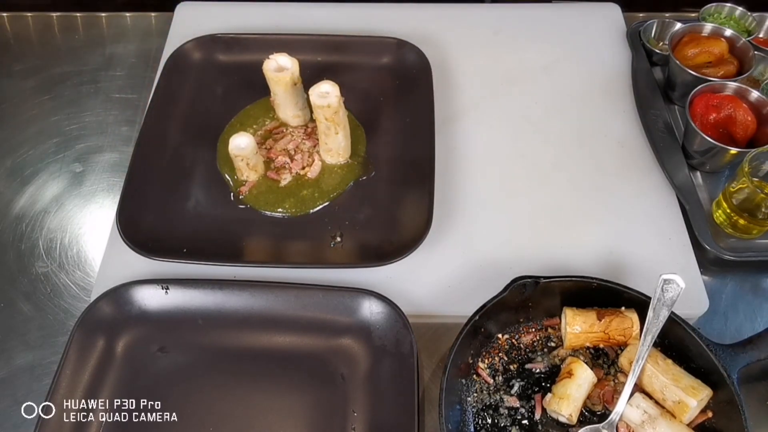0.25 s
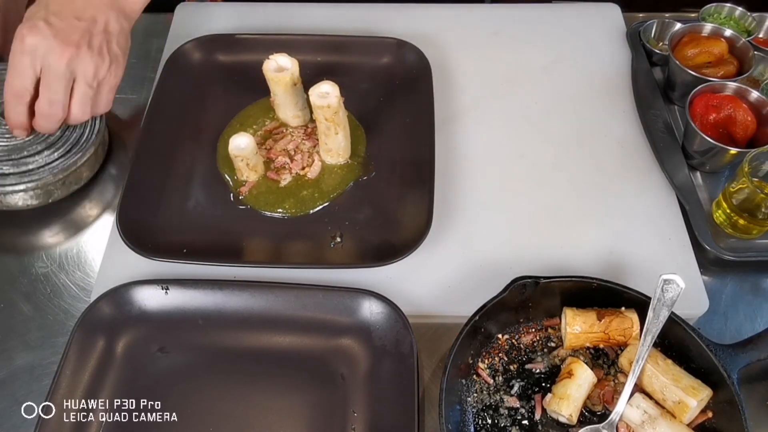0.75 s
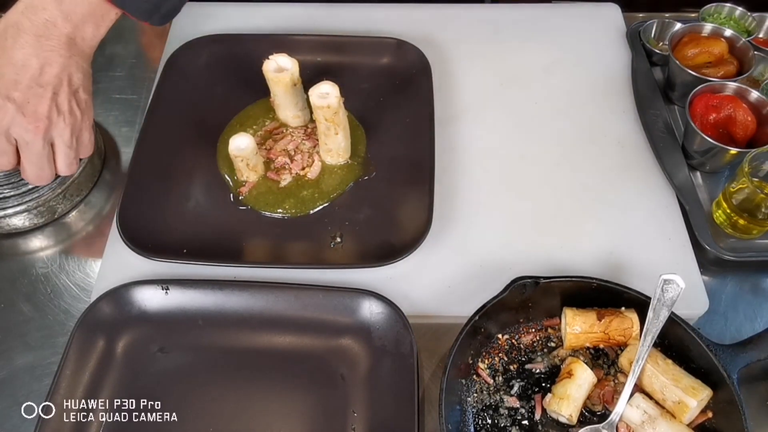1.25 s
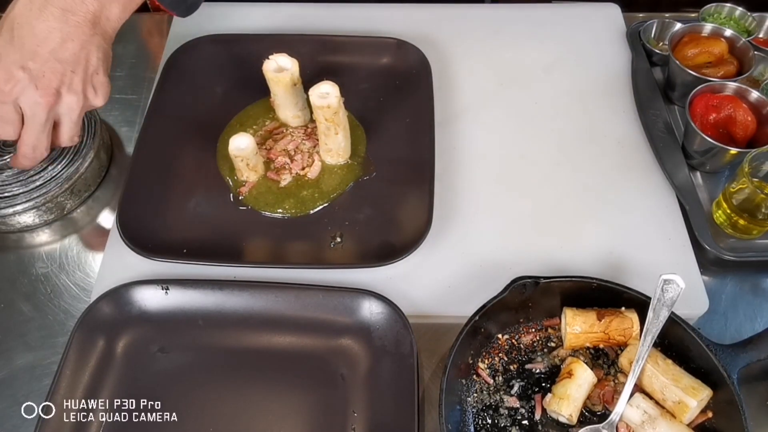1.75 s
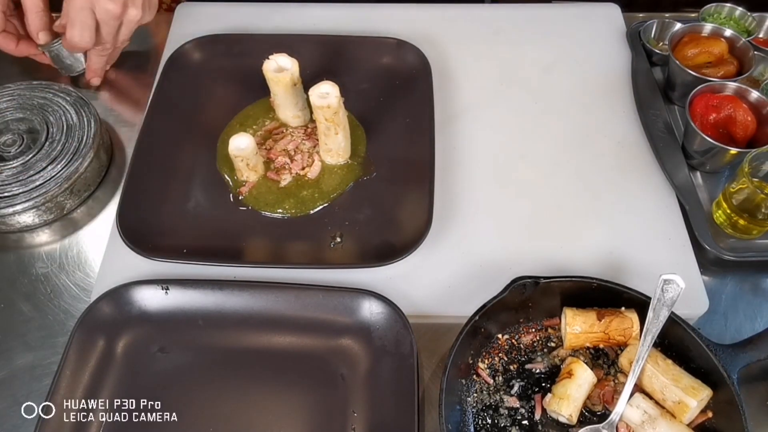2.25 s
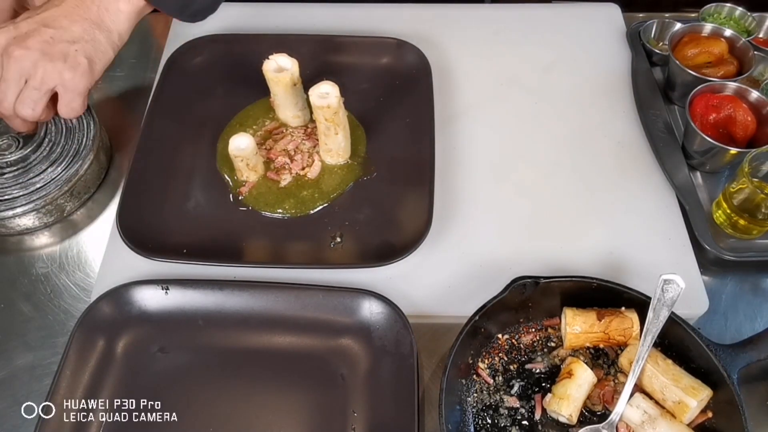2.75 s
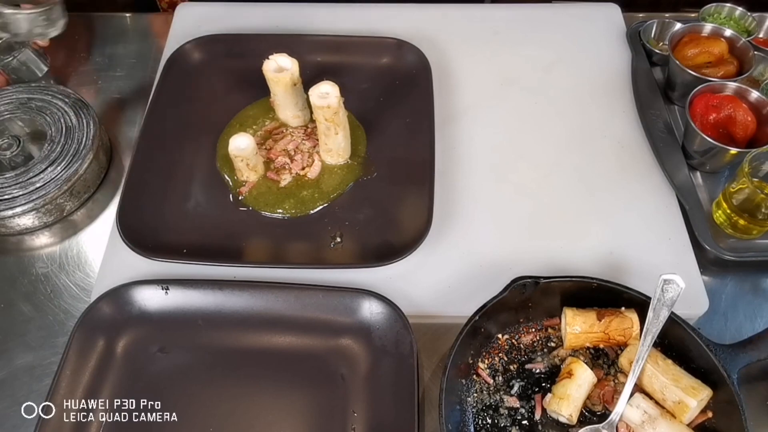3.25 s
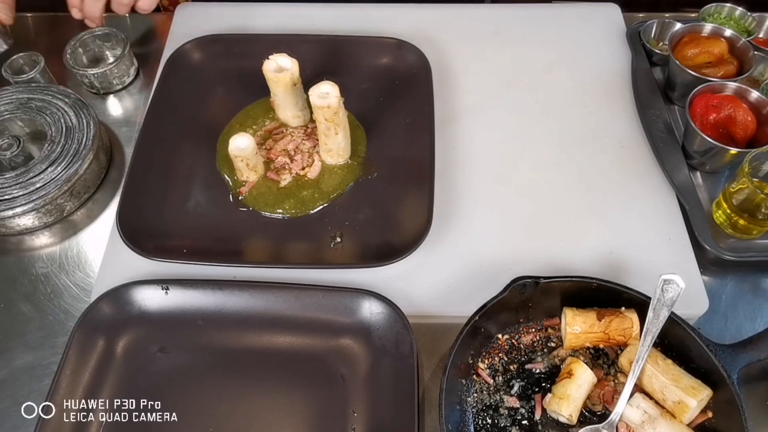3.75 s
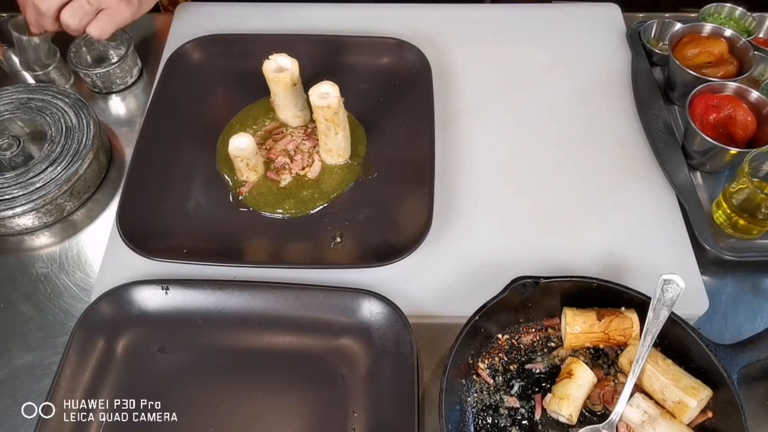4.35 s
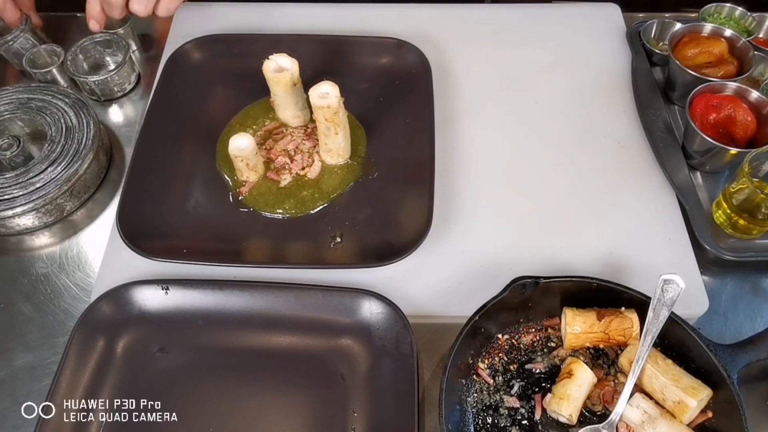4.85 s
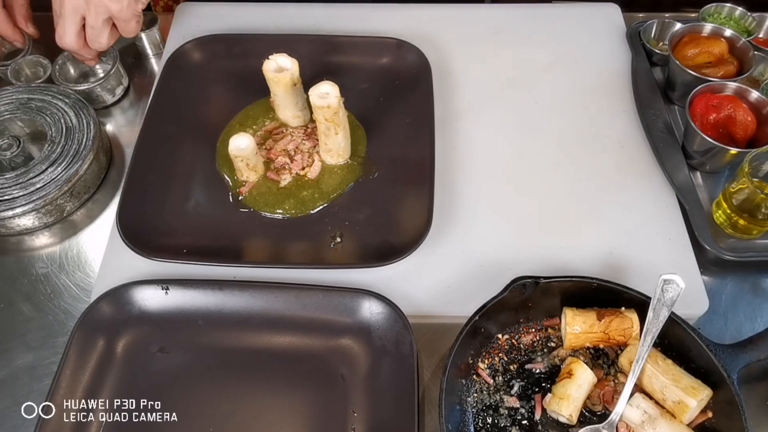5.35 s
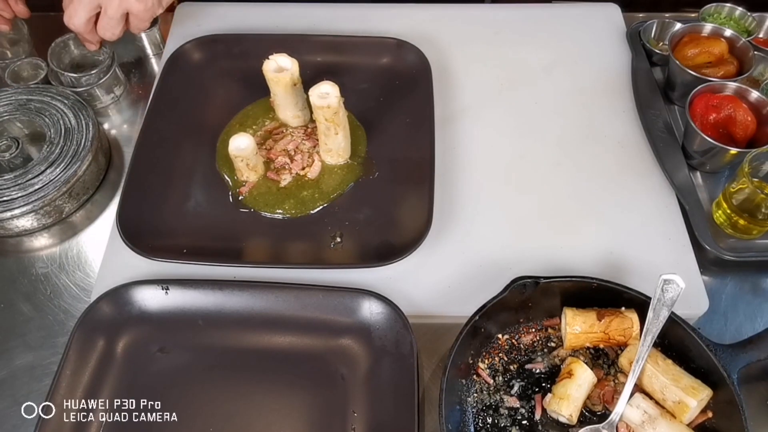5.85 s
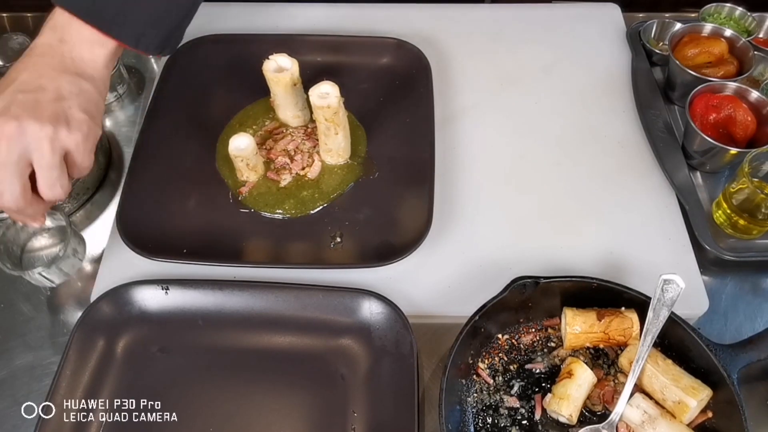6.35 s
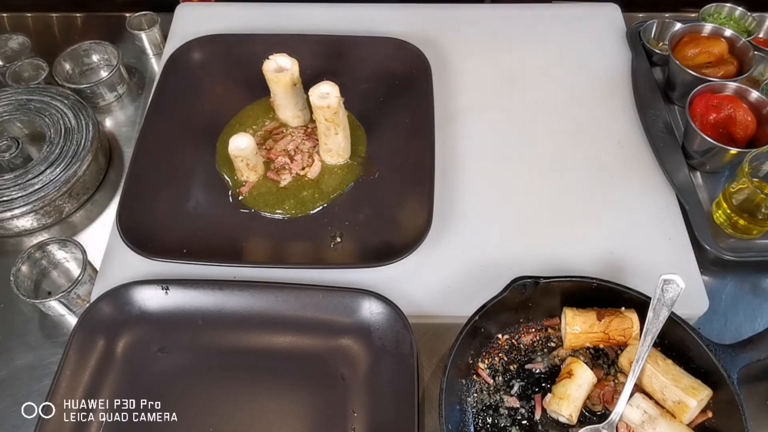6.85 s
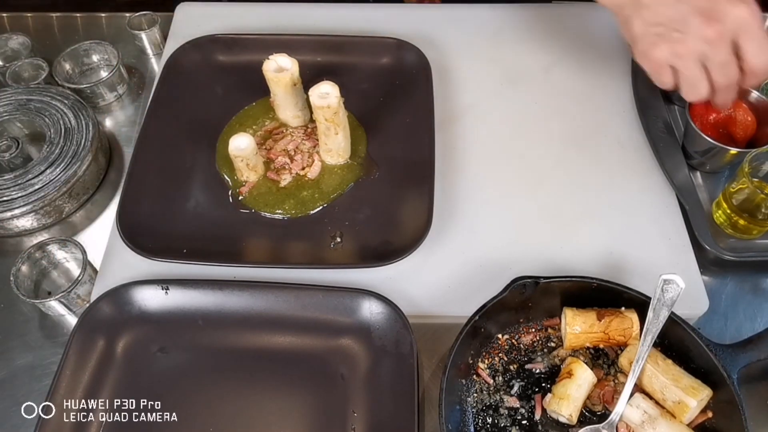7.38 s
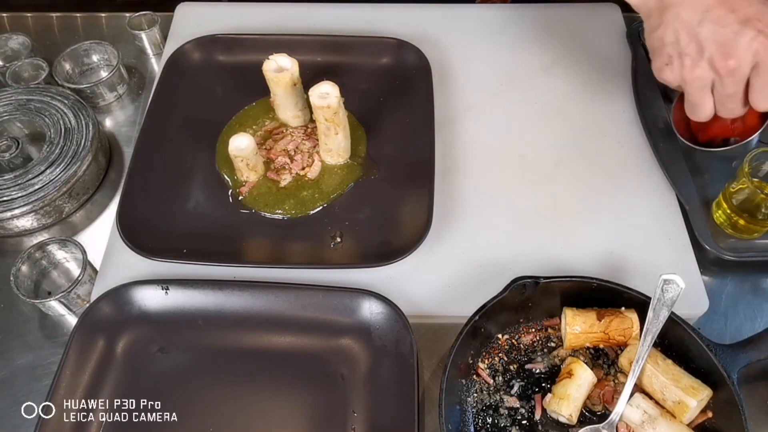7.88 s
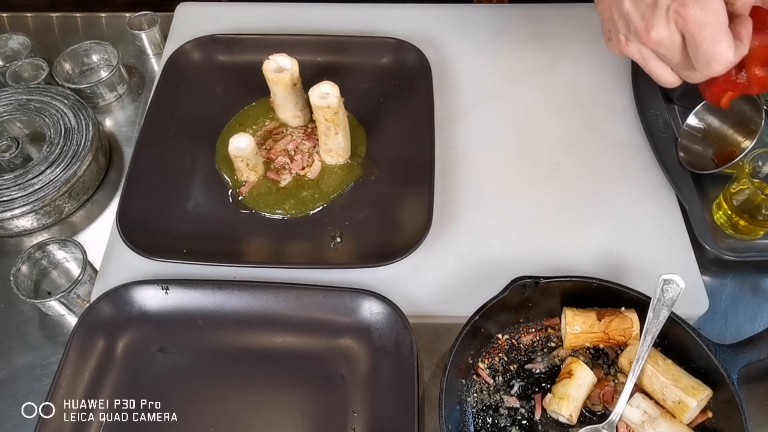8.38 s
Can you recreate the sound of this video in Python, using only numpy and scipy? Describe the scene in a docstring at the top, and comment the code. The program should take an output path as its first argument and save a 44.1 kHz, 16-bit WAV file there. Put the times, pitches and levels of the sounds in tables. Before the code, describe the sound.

A close stereo phone pickup in a hard-walled kitchen, with quiet low rumble, faint hiss and a wavering fridge hum. At 0 s a nest of thin steel rings gives a fading low rattle, then light ticks to 0.6 s. From 0.9 s it lands loudly on the steel worktop; another heavy clack with a deep boom comes near 1.5 s, and a rattling cluster at 1.75-2 s. Softer shuffles and scrapes fill 2.3-3.1 s. Sharp hollow clanks follow at 3.15, 3.6 and 3.8 s, then irregular knocks and gritty slides from 4.1 to 6 s, strongest near 5.7 s. One duller set-down sounds at 6.57 s. It is nearly quiet until a faint metal touch at 7.6 s; clacks at 8.0-8.25 s bring high, short cup rings, and a last faint knock near 8.6 s.

```python
"""Thin steel ring molds are picked out of their nest, knocked together and set down on a steel worktop.
Each knock is a rattle of noise bursts through the worktop's thump and modes and the mold's ring.
Gritty noise swells as steel slides and rattles on, pushes boom the worktop; cup and bowl ring as dying sines.
The place is a hard-walled kitchen with noise-tail echoes, background noise and a faint, wavering fridge hum.
A phone's two microphones hear it, with small differences in delay, level and treble."""
import sys
import numpy as np
from scipy import signal
from scipy.fft import rfft, irfft
from scipy.io import wavfile
from scipy.ndimage import uniform_filter1d

SR = 44100
rng = np.random.default_rng(int(sys.argv[2]) if len(sys.argv) > 2 else 0)


def pcm_store(signal):
    """Save signal as 16-bit PCM."""
    levels = np.round(np.clip(np.atleast_2d(signal), -1, 1) * 32767)
    wavfile.write(sys.argv[1], SR, levels.astype(np.int16).T)


N = 380141


def gain_of(db):
    """Amplitude factor of a level in dB."""
    return 10 ** (np.asarray(db) / 20)


def evened(x):
    """Scales a signal to an effective value of one."""
    return x / np.sqrt(np.mean(x ** 2) + 1e-20)


def read(points, hz):
    """Reads a table between its points along a logarithmic frequency axis."""
    f, value = np.transpose(points)
    return np.interp(np.log(hz + 1), np.log(f + 1), value)


def colour(points):
    """Causal filter of unit energy with the given spectrum."""
    log_gain = np.log(gain_of(read(points, abs(np.fft.fftfreq(4096, 1 / SR)))))
    minimum_phase = np.exp(np.conj(signal.hilbert(log_gain)))
    taps = np.fft.ifft(minimum_phase).real[:2048]
    return taps / np.linalg.norm(taps)


def rings(modes, size, scale=1):
    """Sum of dying sines, one for each mode of a struck body."""
    t = np.arange(size) / SR
    total = 0
    for hz, db, t60 in modes:
        pitch = np.minimum(hz * scale, SR / 2)
        total = total + gain_of(db - 60 * t / t60) * np.sin(2 * np.pi * pitch * t)
    return total


# How much later the left microphone hears a sound; negative means the right one is later:
# (time [s], delay [samples])
LEFT_DELAY = [(0, 15), (.6, 0), (1, -13), (4.8, -13), (5.2, 0), (6, -12), (6.9, -11), (7.4, 7)]


def add(mix, s, pan_db, sound):
    """Places a sound in both microphones, one a little later than the other."""
    late = round(np.interp(s, *np.transpose(LEFT_DELAY)))
    for k, side in enumerate((1, -1)):
        start = round(s * SR) + max(side * late, 0)
        part = mix[k, start:][:sound.shape[1]]
        part += gain_of(side * pan_db / 2) * sound[k, :len(part)]


# Likeness of the diffuse sound at the two microphones: (frequency [Hz], correlation [-1 to 1])
LIKENESS = [(60, 0.98), (130, 0.96), (290, 0.95), (640, 0.23), (1410, 0.12), (3100, 0.098), (6820, -0.13),
            (15000, 0.57)]


def pair(frames, hz):
    """Random spectra for both microphones, alike in the bass."""
    a, b, c, d = rng.standard_normal((frames, len(hz), 4)).T
    same = np.clip(read(LIKENESS, hz), -1, 1)[:, None]
    left, other = a + 1j * b, c + 1j * d
    return np.array([left, same * left + np.sqrt(1 - same ** 2) * other])


# Spectrum of the background: low rumble, faint hiss and a narrow top edge near 16 kHz:
# (frequency [Hz], relative level [dB])
BACKGROUND = [(15, -64), (25, -27), (43, -9.5), (87, -3.5), (123, -1.5), (145, -4.5), (256, -11.5),
              (293, -33.5), (344, -12), (373, -13.5), (1160, -30), (14000, -42), (16000, -34)]
BACKGROUND_DB, PATCHY_DB = -60.5, 1.2  # overall level; unevenness over time and frequency
# Fridge hum partials: (frequency [Hz], relative level [dB])
HUM = [(59.2, -71), (118.4, -75.5), (247.6, -69.5)]


def background():
    """Soft low rumble and hiss of shaped noise, with the fridge hum as sines of wavering level."""
    frames, hz, t = N // 256 + 5, np.fft.rfftfreq(1024, 1 / SR), np.arange(N) / SR
    smooth_in_time = uniform_filter1d(rng.standard_normal((frames, len(hz))), 12, 0)
    patches = evened(uniform_filter1d(smooth_in_time, 14, 1)).T
    spectra = pair(frames, hz) * gain_of(read(BACKGROUND, hz)[:, None] + PATCHY_DB * patches)
    noise = signal.istft(spectra, nperseg=1024, noverlap=768)[1][:, :N]
    noise = gain_of(BACKGROUND_DB) * evened(noise)
    waver = evened(uniform_filter1d(rng.standard_normal(N), 4000))
    hum = sum(gain_of(db + 2.9 * waver) * np.sin(2 * np.pi * f * t) for f, db in HUM)
    return (noise + hum) * gain_of([[-.6], [.6]])  # a little stronger at the right microphone


# Modes of the nest of molds in the hand: (frequency [Hz], relative level [dB], t60 [s])
NEST = [(606, 1, 0.065), (1810, 1.5, 0.027), (1970, 7, 0.018)]


def nest():
    """At the start the nest of molds is still shaking in the hand: fading noise drives its modes."""
    shake = rng.standard_normal((2, N)) * gain_of(-60.0 - 60 * np.arange(N) / SR / 0.27)
    return signal.oaconvolve(shake, rings(NEST, size=4096)[None])[:, :N]


# Gritty swells of steel: slides of the molds and the rattling that dies away after knocks:
# (time of the strongest moment [s], low level [dB], bright level [dB])
SWELLS = [(0.0, -44.5, -89), (0.2, -62.5, -67.5), (0.45, -66.5, -61.5), (1.06, -58, -56.5),
          (1.28, -69, -73), (1.43, -59.5, -68), (1.948, -45.5, -51.5), (2.35, -76, -71), (2.63, -52, -61),
          (2.96, -65.5, -61), (3.221, -53.5, -52), (3.76, -50, -54), (4.21, -52.5, -59), (4.49, -55, -85),
          (4.8, -59, -62.5), (5.08, -55.5, -64), (5.408, -41.5, -50.5), (5.898, -47, -49), (7.89, -76, -74),
          (8.19, -63.5, -81), (8.33, -62.5, -61), (8.6, -76, -71)]
SWELL_DB_PER_S, FADE_DB_PER_S, HOLLOW_HZ = 110.5, 153, 740
# Spectra shared by swells and knocks, from deep to bright: (frequency [Hz], relative level [dB])
THUMP = [(80, -21.5), (150, -4.5), (230, 6), (500, 6), (800, -30), (1500, -46.5)]
KNOCK = [(300, -28.5), (560, -5), (720, 0.5), (850, -0.5), (1100, -5.5), (1400, -7.5), (2200, -51.5)]
CLACK = [(800, -33.5), (1300, -3), (1700, 1.5), (2200, 1.5), (2600, 0), (3100, -8.5), (5000, -42)]
CLINK = [(1800, -54), (3000, -0.5), (4500, 6.5), (7000, 1), (9000, -11.5), (13000, -49)]
TICK = [(5500, -39), (8000, -1.5), (10800, 2.5), (12500, -1), (14500, -6.5), (15700, -2), (16500, -4)]


def gritty_swells():
    """Steel sliding and rattling on: uneven noise with one hollow band; each swell rises and fades."""
    t, low, bright = np.arange(N) / SR, 0, 0
    for s, low_db, bright_db in SWELLS:
        swell = gain_of(np.minimum(SWELL_DB_PER_S * (t - s), FADE_DB_PER_S * (s - t)))
        low = low + gain_of(low_db) * swell
        bright = bright + gain_of(bright_db) * swell
    grain_db = 3.7 * np.repeat(rng.standard_normal(N // 64 + 1), 64)[:N]
    grit = rng.standard_normal((2, N)) * gain_of(grain_db)
    grit[0] = 1.15 * grit[0] + 0.28 * grit[1]
    low_colour = colour(KNOCK) + 0.68 * colour(CLACK) + 0.54 * colour(THUMP)
    low_grit = signal.oaconvolve(grit, low_colour[None])[:, :N]
    # the hollow band: shift it to zero frequency, smooth, shift back
    turn, r = np.exp(2j * np.pi * HOLLOW_HZ * t), np.exp(-np.pi * 200 / SR)  # 200 Hz wide
    low_grit += 4.2 * (turn * signal.lfilter([1 - r], [1, -r], grit / turn)).real
    bright_colour = colour(CLINK) + 0.71 * colour(TICK)
    bright_grit = signal.oaconvolve(grit, bright_colour[None])[:, :N]
    return low * low_grit + bright * bright_grit


# Knocks of the molds: (time [s], strength [dB], weight on the worktop [dB], hardness [dB],
# mold ring pitch [Hz], rattle t60 [s])
KNOCKS = [(0.0044, -35.5, -16, -1.5, 1870, .14), (0.3295, -47.5, 5, 5, 6700, .16),
          (0.3533, -48.5, -2.5, 8, 6500, .1), (0.4863, -51, 2.5, 5, 2350, .34),
          (0.5554, -53, 4, 1.5, 2100, .2), (0.8862, -22, -4.5, -3, 2360, .17),
          (0.9479, -32.5, -4.5, -0.5, 2100, .11), (1.0989, -50, -0.5, 4.5, 2110, .42),
          (1.2071, -48, -0.5, -9, 2280, 0.18), (1.3687, -59.5, 9, -5, 2200, .24),
          (1.4399, -40, 3.5, -0.5, 2280, .45), (1.474, -24, -0.5, -4.5, 2460, .17),
          (1.5246, -33, 4, -4, 2100, .25), (1.7621, -30.5, -5, -4, 2580, .28),
          (1.852, -32, 1, -1.5, 2450, .12), (1.9146, -22.5, -3.5, -6.5, 1900, .065),
          (1.9757, -32.5, -2, 0, 2680, .11), (2.3475, -55, -3, 18.5, 4000, 0.074),
          (2.4294, -68, 22, 11, 4000, .25), (2.4734, -44.5, 11.5, -4.5, 2100, .19),
          (2.5744, -43.5, 9.5, -21, 2060, .14), (2.621, -36, -6, -2.5, 2300, .1),
          (2.6412, -43, 7.5, 9.5, 2900, .14), (2.6792, -35.5, 7.5, -8, 2510, 0.097),
          (2.8718, -36.5, 0, -7.5, 2350, .27), (2.9668, -39.5, 2.5, -8, 2280, .24),
          (3.0893, -45, 8.5, 14, 3600, 0.082), (3.158, -21.5, -7, -1.5, 2350, .26),
          (3.5945, -22, 1, 0, 3070, .25), (3.7777, -25, -2.5, -1, 2370, .19),
          (4.11, -36.5, 12, -1.5, 1860, .16), (4.129, -30, -4, 0, 2780, .21),
          (4.388, -28, -2.5, -0.5, 3820, .26), (4.4939, -28.5, 1, -8.5, 2127, .26),
          (4.759, -45.5, 12, 1.5, 2074, .2), (4.7764, -26.5, -5.5, -7, 2250, .19),
          (4.8703, -45.5, 11, -4, 2480, .22), (5.012, -32, 2.5, 2.5, 2590, .21),
          (5.2158, -47, 12.5, -5.5, 2170, .091), (5.253, -41.5, -7, 9, 6000, .24),
          (5.3217, -33, 1.5, 0.5, 2085, .39), (5.3747, -32.5, 0, -2.5, 2345, .3),
          (5.5112, -37.5, 3.5, -5, 2190, .19), (5.5537, -34, 3.5, -7.5, 2814, .23),
          (5.693, -19.5, -5.5, 1, 1855, .27), (5.8691, -34.5, -1.5, -5, 2085, .2),
          (6.0032, -36.5, 1.5, -8, 2240, .25), (6.457, -45.5, 13, -10.5, 2100, .12),
          (6.5651, -27, 1, -13, 2250, .21), (7.5713, -61.5, -17, 5, 6630, .064),
          (7.658, -66, -21, 0, 1960, .11), (7.7722, -43.5, 2, 1, 2500, 0.13),
          (8.0309, -27, -6.5, -0.5, 2900, 0.34), (8.1184, -28, -8.5, 1, 1950, .28),
          (8.177, -40, -13, 0, 2230, .068), (8.2303, -38, -31, -1, 2200, .18),
          (8.585, -49.5, -10, -3, 2330, 0.45)]
# Modes of the steel worktop: (frequency [Hz], relative level [dB], t60 [s])
WORKTOP = [(191.6, -19, 0.46), (232.7, 13, 0.19), (325, -9, 0.16), (400, -9, 0.051), (446.4, -9, 0.29),
           (495, -0.5, 0.11), (543, -3.5, 0.15), (735, 6, 0.054), (832, -16, 0.016), (914, -6, 0.074)]
# Modes of a ring mold: (multiple of its ring pitch, relative level [dB], t60 [s])
MOLD = [(1, 0, .013), (1.58, -6, .01), (2.3, -10, .008)]
# How well the spot under the hand drives the worktop: (time [s], level [dB])
PLATE_REACH = [(0, -6), (0.8, 0.5), (1.5, -1.5), (2.2, -2.5), (3.0, 3.5), (4.0, -3), (4.6, -2.5), (5.6, 0),
               (6.6, -4), (7.7, -2), (8.1, 0)]
# Where the hand works: (time [s], left minus right level [dB])
HAND_SIDE = [(0, 2.5), (1.0, -1.5), (1.8, 4), (2.6, 5), (3.6, -3), (4.6, -3.5), (6.5, 1), (7.6, -6),
             (8.1, 2), (8.62, -2)]
LEAD_S, GRAZE = .0045, .1  # one mold edge grazes the steel before the blow; strength of that graze
RISE_S, RISE_SHORTER_PER_DB, SOFTEST_DB = 0.0016, 0.7, -6.5  # hard contacts start more abruptly
HOLLOW_DB, HOLLOW_PER_WEIGHT, PLATE_DB = 2, 0.87, -3.5
# hard and strong contacts reach the top treble
TICK_DB, TICK_PER_HARDNESS, TICK_FULL_DB, TICK_PER_STRENGTH = 3.5, 1.9, 8, 0.27
RING_DB, RING_DB_PER_OCTAVE, RING_FROM_HZ = -13, 5, 2200  # small molds ring out more


def knocks():
    """Each knock is a burst of uneven contacts; it excites the broad parts, the worktop modes and the mold."""
    out, since = np.zeros((2, N)), np.arange(12288) / SR - LEAD_S
    t, graze = np.maximum(since, 0), GRAZE * np.exp(-abs(since) / 0.0044)
    thump, knock, clack, clink, tick = (colour(c) for c in (THUMP, KNOCK, CLACK, CLINK, TICK))
    top, alike = rings(WORKTOP, size=8192), .45
    long_thump = np.pad(thump, (0, len(top) - len(thump)))
    plate = gain_of(PLATE_DB) * (top / np.linalg.norm(top) + 1.38 * long_thump)
    swell = 1 - 0.32 * np.exp(-t / 0.0018)  # the heavy plate takes longer to start moving
    for blow_s, db, weight_db, hard_db, hz, t60 in KNOCKS:
        s = max(blow_s - LEAD_S, 0)
        pan_db = np.interp(blow_s, *np.transpose(HAND_SIDE))
        rise = RISE_S * gain_of(-RISE_SHORTER_PER_DB * max(hard_db, SOFTEST_DB))
        grain = gain_of(2.61 * np.repeat(rng.standard_normal(len(t) // 128), 128))
        # a sharp first contact, the stronger the shorter the knock; the loose molds keep rattling
        rattle = 0.42 * gain_of(-60 * t / t60)
        first_contact = 0.075 / t60 * gain_of(-60 * t / 0.023)
        force = grain * (graze + (rattle + first_contact) * (1 - np.exp(-t / rise)))
        left, other = force * rng.standard_normal((2, len(t)))
        # the wide plate and near walls give each microphone its own mix of short waves
        apart = np.array([left, alike * left + np.sqrt(1 - alike ** 2) * other])

        ring = rings(MOLD, size=len(tick), scale=hz)
        tick_db = TICK_DB + TICK_PER_HARDNESS * min(hard_db, TICK_FULL_DB) + TICK_PER_STRENGTH * db
        ring_db = RING_DB + RING_DB_PER_OCTAVE * np.log2(hz / RING_FROM_HZ) + max(hard_db, 0)
        high = clack + gain_of(hard_db) * clink + gain_of(tick_db) * tick
        high = high + gain_of(ring_db) * ring / np.linalg.norm(ring)
        add(out, s, pan_db, signal.fftconvolve(apart, gain_of(db) * high[None], axes=1))

        hollow_db = db + HOLLOW_DB + HOLLOW_PER_WEIGHT * weight_db
        hollow = signal.fftconvolve(apart * swell, gain_of(hollow_db) * knock[None], axes=1)
        add(out, s, pan_db, hollow)

        plate_db = db + weight_db + np.interp(s, *np.transpose(PLATE_REACH))
        deep = signal.fftconvolve(left * swell, gain_of(plate_db) * plate)
        add(out, s, 0, deep * np.ones((2, 1)))  # long waves reach both microphones alike
    return out


# Dying of the echo in the hard-walled kitchen: (frequency [Hz], t60 [s])
KITCHEN = [(100, 0.34), (260, 0.48), (700, 0.42), (1840, 0.54), (4850, 0.44), (9000, 0.33), (15000, 0.15)]


def kitchen(x):
    """Three noise tails, each band dying at its own speed, take turns so that echoes vary over time."""
    hz, out = np.fft.rfftfreq(256, 1 / SR), 0
    t = np.arange(600) * 64 / SR
    for k in range(3):
        spectra = pair(len(t), hz) * gain_of(-60 * t / read(KITCHEN, hz)[:, None])
        tail = signal.istft(spectra, nperseg=256, noverlap=192)[1]
        tail *= 1 - np.exp(-np.arange(tail.shape[1]) / SR / 0.011)  # reflections build up
        tail /= np.linalg.norm(tail[0])
        turn = np.sqrt(2 / 3) * np.cos(np.pi * (7 * np.arange(N) / SR + k / 3))
        out = out + signal.fftconvolve((x * turn)[None], tail, axes=1)[:, :N]
    return out


# The hand leans on the nest and the whole worktop booms: (time [s], level [dB])
BOOMS = [(0.941, -41.5), (1.098, -44.5), (1.21, -48.5), (1.441, -49), (1.472, -29.5), (2.874, -45.5),
         (4.494, -44), (6.568, -53)]
# Spectrum of that boom: (frequency [Hz], relative level [dB])
BOOM = [(20, -30.5), (35, -9), (60, -4.5), (95, -1), (130, -0.5), (170, -7.5), (300, -32.5)]
BOOM_T60_S = .25


def booms():
    """A soft push, as dying noise through a deep filter, sets the whole worktop shaking at its deepest."""
    out, t = np.zeros((2, N)), np.arange(12288) / SR
    for s, db in BOOMS:
        push = rng.standard_normal(len(t)) * gain_of(db - 60 * t / BOOM_T60_S)
        add(out, s, 0, signal.fftconvolve(push, colour(BOOM)) * np.ones((2, 1)))
    return out


# Clinks of the small steel cup: (time [s], level [dB], left minus right level [dB])
CLINKS = [(2.6408, -69, 7), (8.1797, -49, -11.5), (8.2323, -51.5, -5), (8.3601, -74, -4)]
# Modes of the cup, the first two being the low ones: (frequency [Hz], relative level [dB], t60 [s])
CUP = [(4500, -3.5, 0.37), (5300, -8, 0.43), (6825, -1, 0.34), (9220, -11.5, .25), (9900, -12.5, 0.4),
       (10860, -14, 0.43), (12400, -20, .12), (13100, -13, .12)]


def cup():
    """A sharp tap rings the small cup: close mode pairs that beat; the high ones fall quickly at first."""
    out, t = np.zeros((2, N)), np.arange(22050) / SR
    low, high = (rings(modes, size=len(t)) + 0.68 * rings(modes, size=len(t), scale=1.003)
                 for modes in np.split(CUP, [2]))
    ring = low * (1 - gain_of(-60 * t / .1))  # the low modes swell in
    ring = ring + high * (1 + 7.1 * gain_of(-60 * t / 0.12))
    for s, db, pan_db in CLINKS:
        add(out, s, pan_db, gain_of(db) * ring * np.ones((2, 1)))
    return out


# A finger touches a small steel bowl: (time [s], level [dB])
TOUCHES = [(7.57, -76.5), (7.66, -91)]
# Modes of the bowl: (frequency [Hz], relative level [dB], t60 [s])
BOWL = [(1045, -3.5, 0.07), (2000, -8, 0.043), (3230, 8, 0.009), (5470, -9, .02), (6420, 5, 0.017),
        (10800, 1, .02)]


def bowl():
    """A soft, scuffing touch, as dying noise, makes the bowl's modes ring roughly."""
    out, t = np.zeros((2, N)), np.arange(8192) / SR
    for s, db in TOUCHES:
        scuff = rng.standard_normal((2, len(t))) * gain_of(db - 60 * t / 0.15)
        add(out, s, 0, signal.fftconvolve(scuff, rings(BOWL, size=16384)[None], axes=1))
    return out


# The phone's body shades the left microphone: (frequency [Hz], left minus right level [dB])
SHADE = [(60, 0), (150, 1.5), (380, -2.5), (950, -4), (2380, -4.5), (5980, -2.5), (15000, -9.5)]


def shaded(x):
    """Tilts the balance of the two microphones with frequency, as the phone's body does."""
    half_db = read(SHADE, np.fft.rfftfreq(N, 1 / SR)) / 2
    return irfft(rfft(x) * gain_of([half_db, -half_db]), N)


def scene():
    """Sums the sounds at the worktop, adds the kitchen's answer and lays the background under them."""
    near = nest() + gritty_swells() + knocks() + booms() + cup() + bowl()
    echo = gain_of(-3.) * kitchen(near.mean(0))
    return shaded(near + echo) + background()


EDGE_HZ = 16000


def record(dry):
    """Bass cut at 40 Hz and band limit of the recorder."""
    dry = signal.sosfilt(signal.butter(2, 40, "high", fs=SR, output="sos"), dry)
    return signal.oaconvolve(dry, signal.firwin(511, EDGE_HZ, window=("kaiser", 9), fs=SR)[None], "same")


dry = scene()
out = record(dry)
pcm_store(out)
```